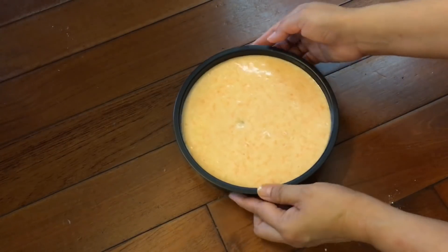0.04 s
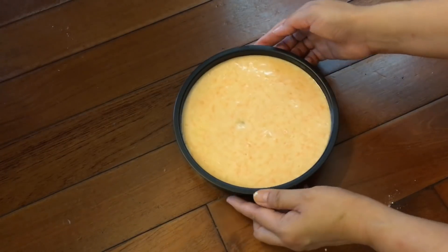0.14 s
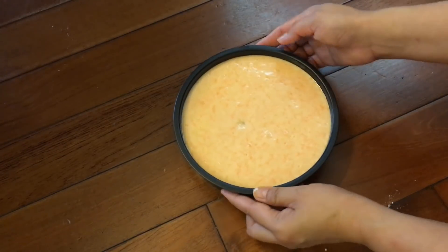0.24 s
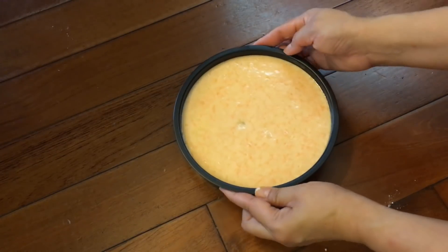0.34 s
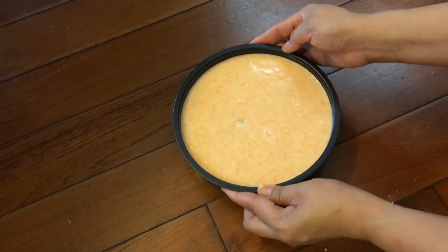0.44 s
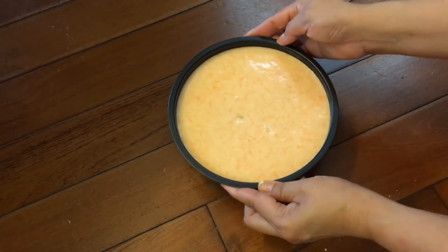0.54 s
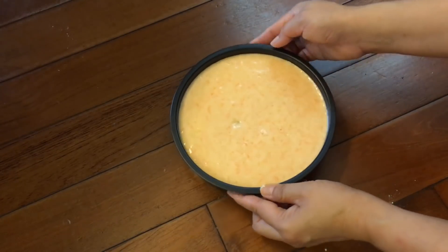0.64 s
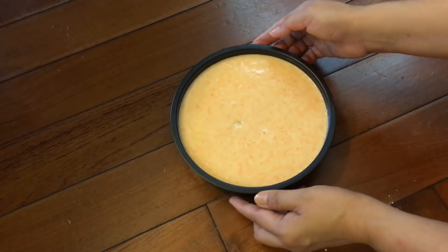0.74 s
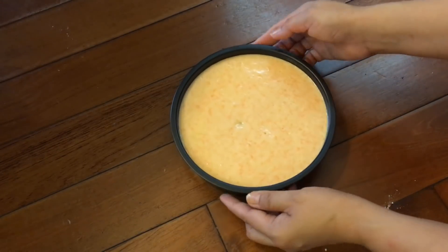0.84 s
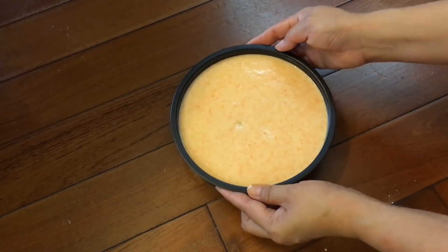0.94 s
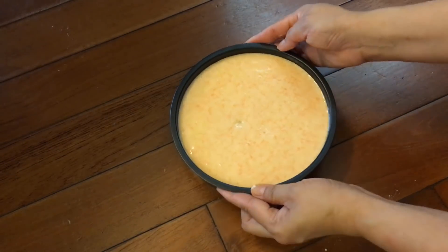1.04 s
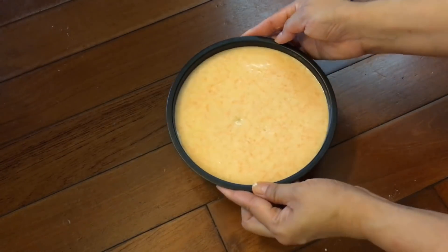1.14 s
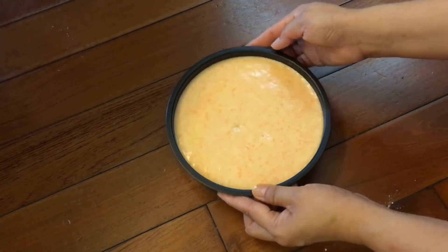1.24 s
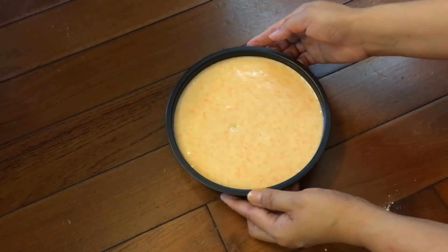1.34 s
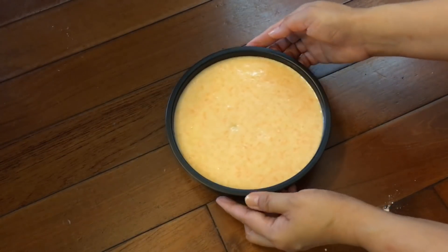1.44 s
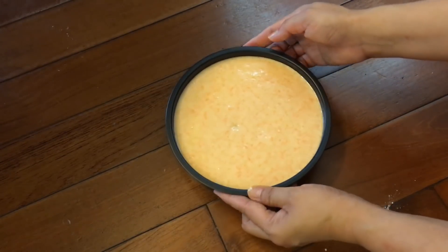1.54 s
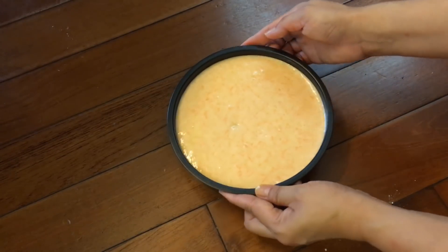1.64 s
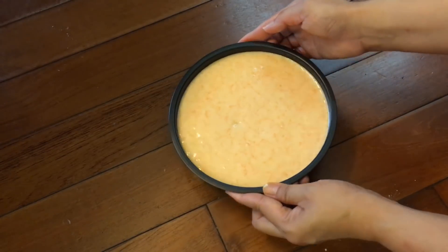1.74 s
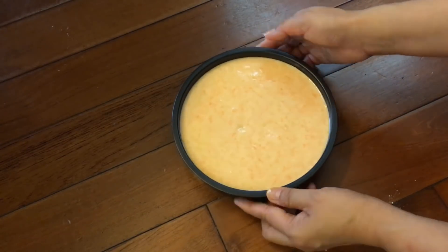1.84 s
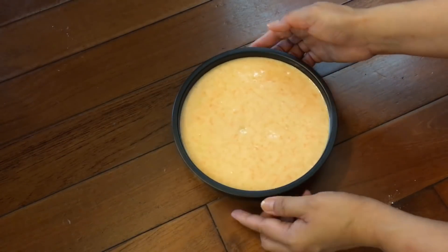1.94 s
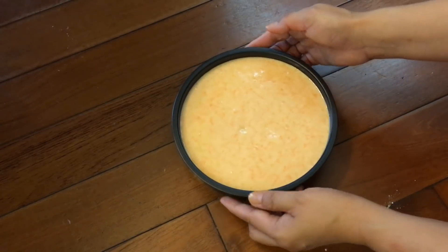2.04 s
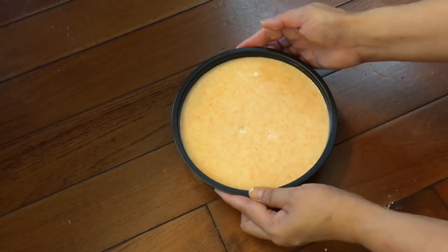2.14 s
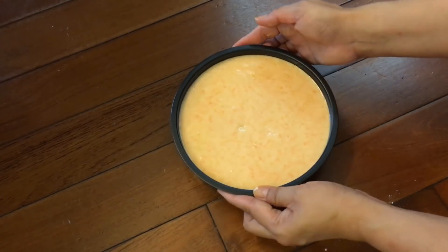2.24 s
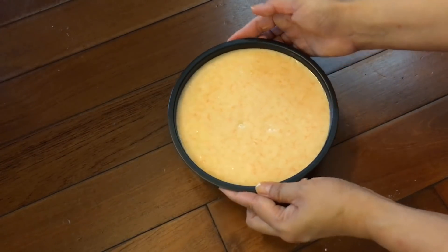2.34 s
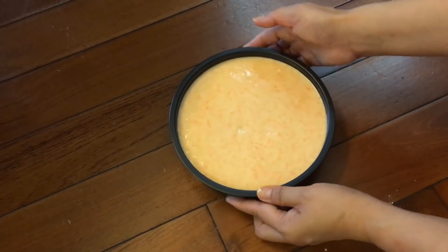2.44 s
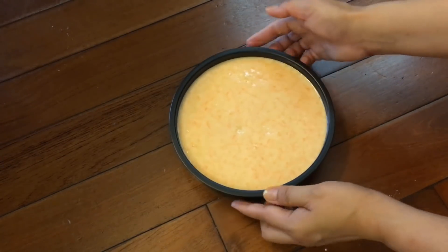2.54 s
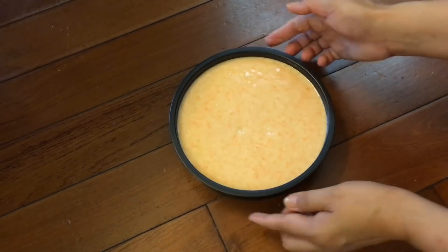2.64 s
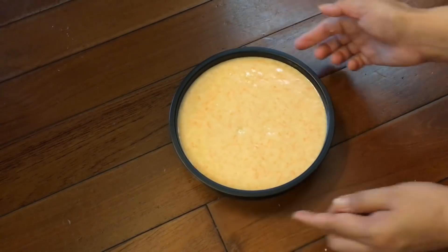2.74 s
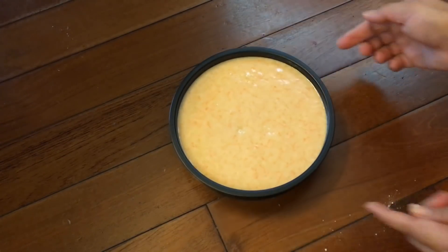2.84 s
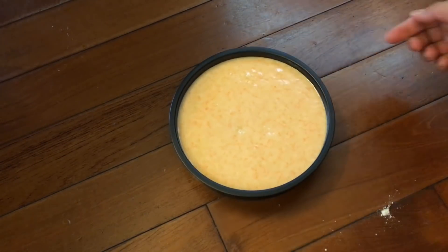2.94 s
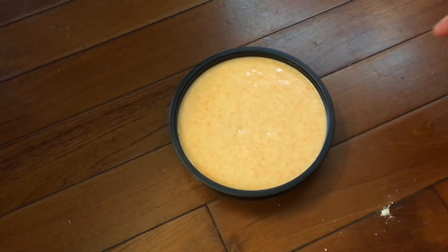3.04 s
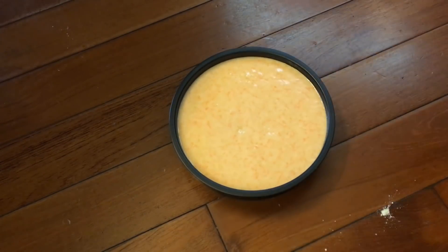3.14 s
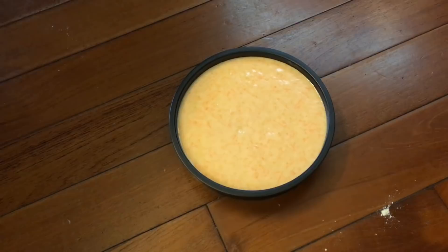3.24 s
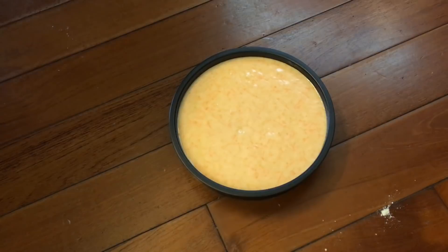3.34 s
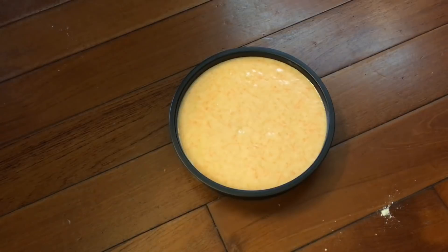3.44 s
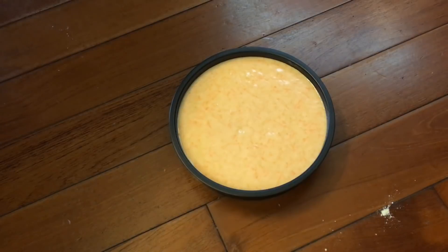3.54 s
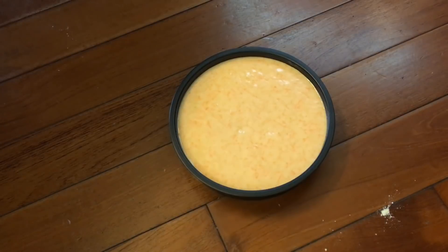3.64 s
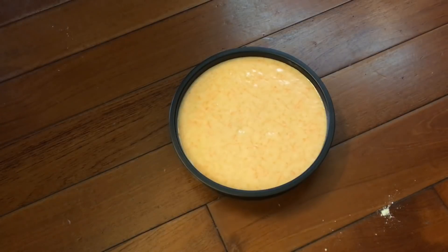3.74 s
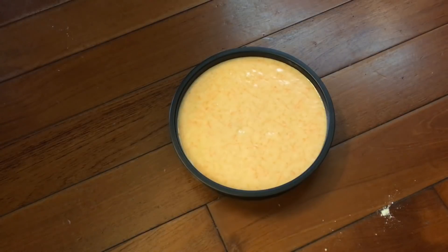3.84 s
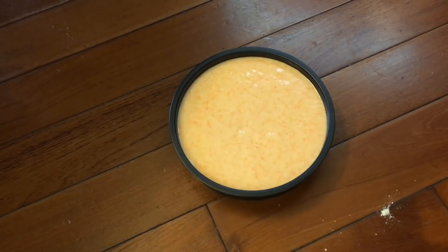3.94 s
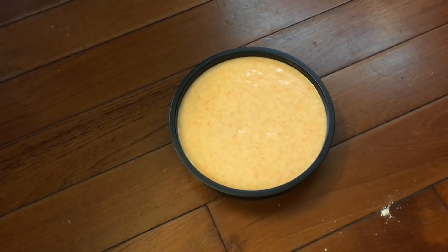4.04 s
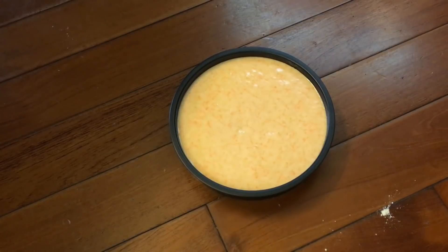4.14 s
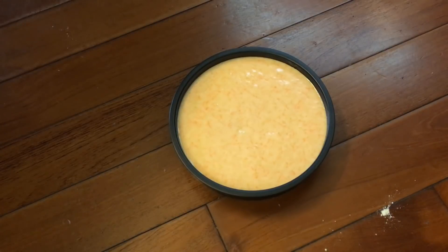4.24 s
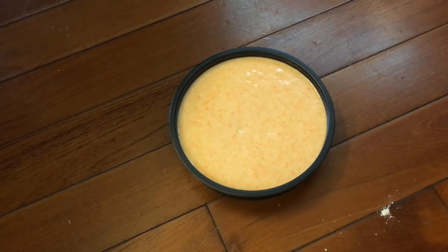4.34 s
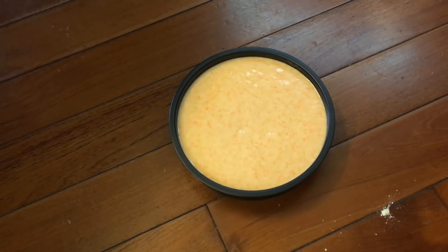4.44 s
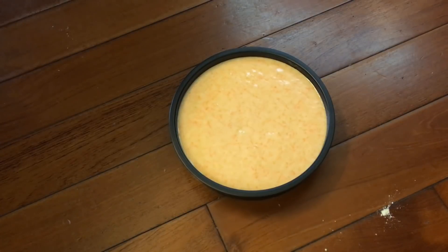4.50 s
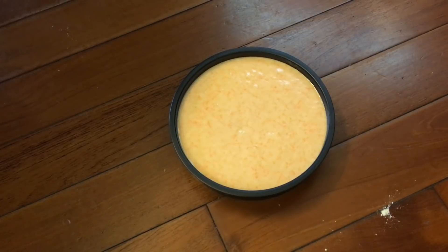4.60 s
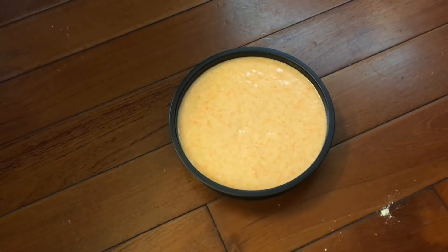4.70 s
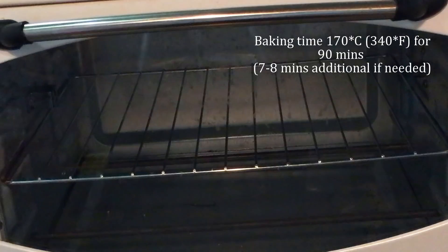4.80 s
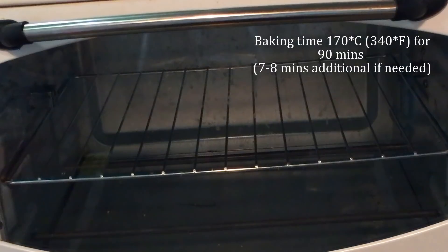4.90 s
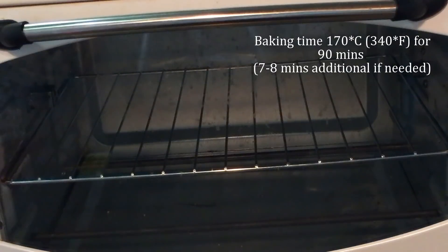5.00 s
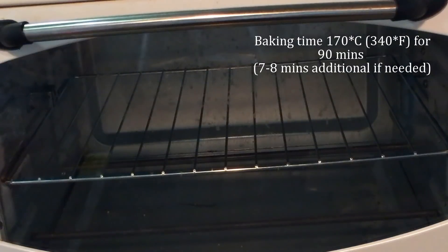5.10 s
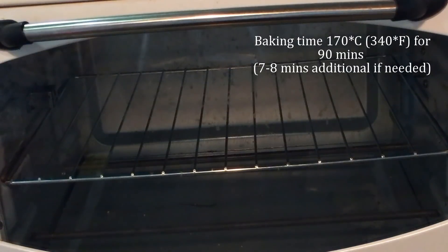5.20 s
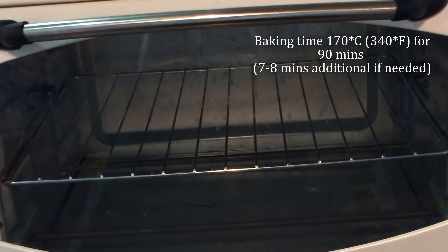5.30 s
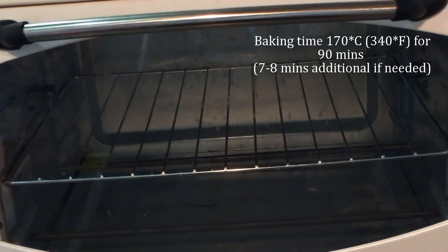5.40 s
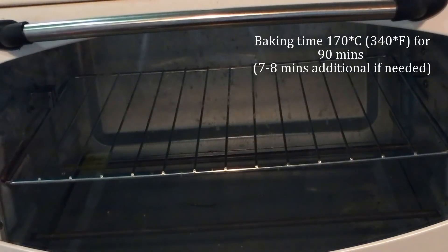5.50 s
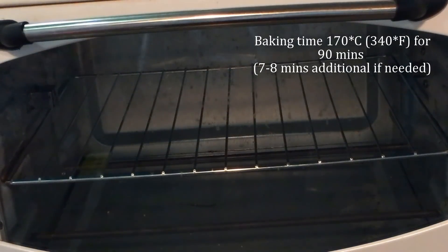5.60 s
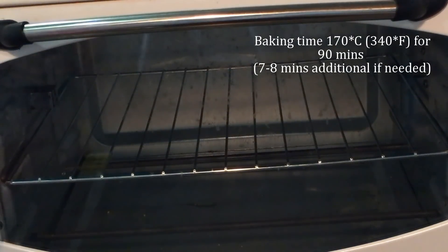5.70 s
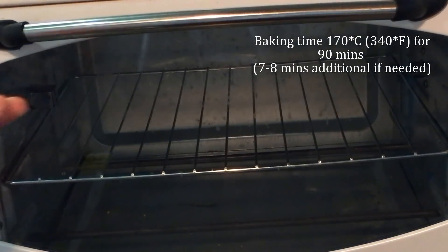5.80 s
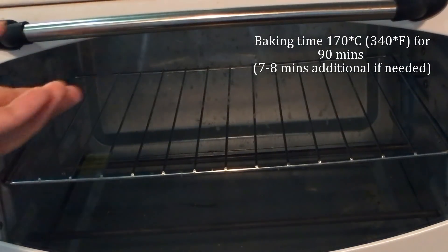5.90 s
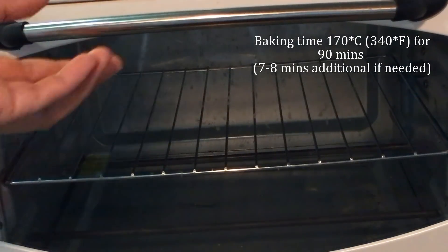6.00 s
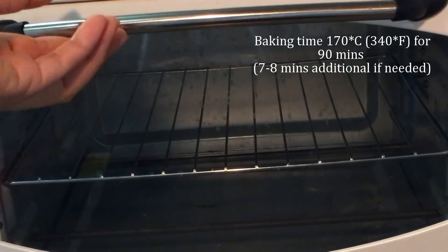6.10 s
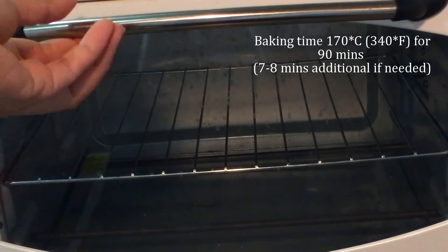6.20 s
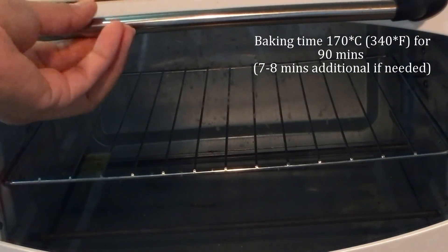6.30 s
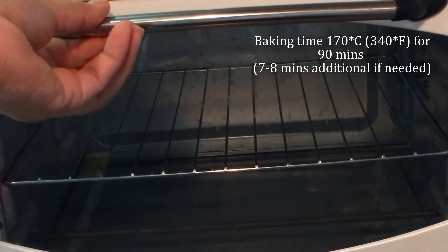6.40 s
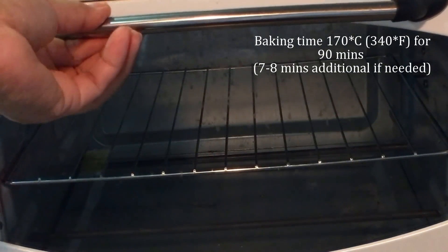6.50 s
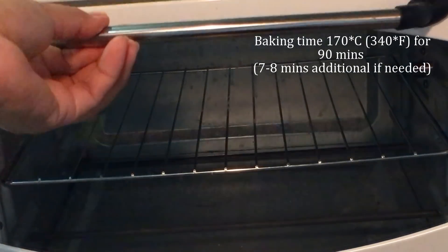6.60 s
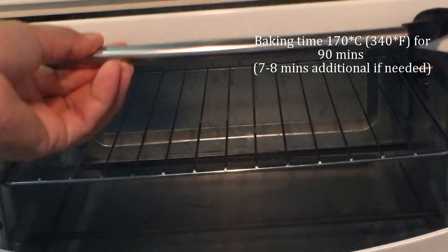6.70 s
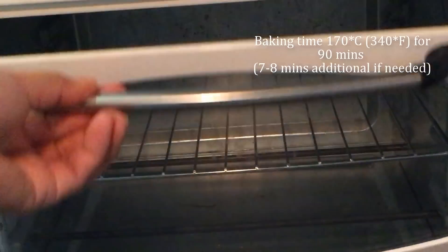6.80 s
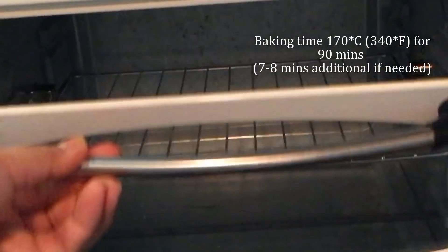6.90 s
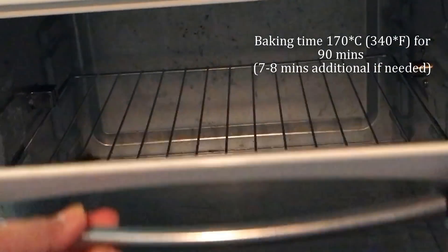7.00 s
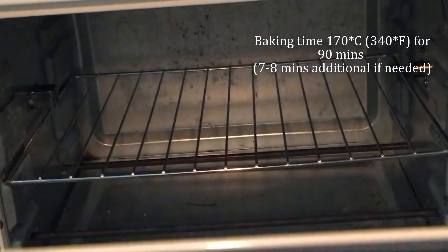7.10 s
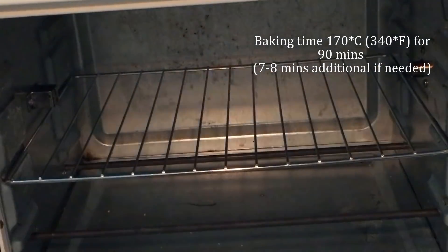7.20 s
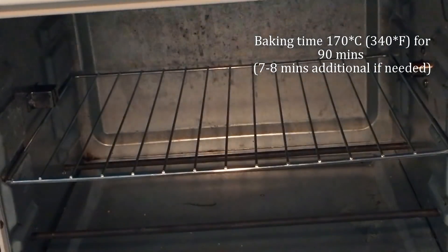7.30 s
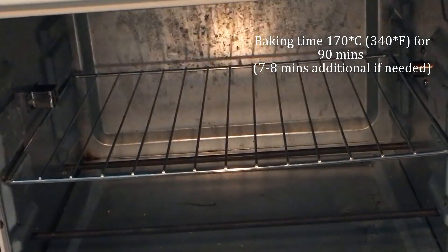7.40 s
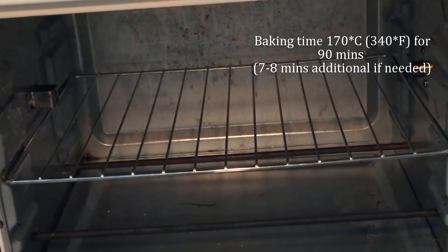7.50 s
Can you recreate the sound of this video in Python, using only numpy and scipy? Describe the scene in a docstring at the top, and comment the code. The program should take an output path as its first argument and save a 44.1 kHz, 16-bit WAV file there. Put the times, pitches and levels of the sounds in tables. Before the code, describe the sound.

A metal cake pan full of batter clacks onto a wooden floor five times, at about 0.1, 0.7, 1.4, 1.9 and 2.5 seconds. Each landing is loud and close, with a short sheet-metal rattle, a faint ring and a low thump of the boards; the second and fourth are softer and duller. Only faint kitchen hiss and low rumble follow, broken by a blink of silence around 4.8 seconds. At 5 seconds a small oven gives one sharp metallic ping, probably its timer bell. The clockwork timer then ticks lightly, about four times a second, over a faint hum and thin whine until the end. Around 6.6 seconds the door catch clicks and scrapes. The door clunks at 6.9 seconds, jolting the casing with a hollow boom, then the hinge scrapes softly, with two small clicks near 7.4 seconds.

```python
"""A metal cake pan full of batter clacks onto a wooden floor, five times: it lands on one edge, slaps
flat and settles, its bottom ringing, its sheet metal rattling, the boards thumping underneath.
After a blink of silence we are at a small oven: one sharp metallic ping, probably the timer's bell,
then the clockwork timer ticks over a faint hum and whine. The door is pulled open: the catch clicks,
the door clunks and jolts the casing, and the hinge scrapes in many tiny slips."""
import sys
import numpy as np
from scipy import signal
from scipy.fft import rfft, irfft, next_fast_len
from scipy.io import wavfile
from scipy.ndimage import uniform_filter1d

SR = 44100
rng = np.random.default_rng(int(sys.argv[2]) if len(sys.argv) > 2 else 0)


def persist_wave(psi):
    """Save psi, clipped to +-1, as 16-bit WAV."""
    counts = np.round(np.clip(psi, -1, 1) * 32767).astype(np.int16)
    wavfile.write(sys.argv[1], SR, np.atleast_2d(counts).T)


N = 332955
TIME = np.arange(N) / SR
RING_TIME = TIME[:SR * 2 // 3]

# The drops. Each row: start in seconds, force in dB, tilt time from edge to flat in seconds, contact
# hardness in Hz, clash of the edge in dB, give of the floor in dB, shimmer of the wall in dB.
DROPS = [(0.109, 0.5, 0.0082, 2755, -2, 1.5, 3), (0.7458, -2, 0.0038, 1400, -10.5, -3.5, -12.5),
         (1.3556, 0.5, .0115, 2637, -2, -1.5, 1), (1.9108, -4.5, .0092, 1477, -1.5, -1, -13),
         (2.53, 1.5, 0.0062, 4530, -0.5, -0.5, 6)]
# Ringing bodies. Each row: pitch in Hz, relative level in dB, ring time (t60) in seconds.
PAN_MODES = [(362, -9, 0.06), (482, -3, 0.023), (619, -16, 0.079), (735, -13, 0.045), (934, -8.5, 0.041),
             (1097, -7, 0.025), (1400, -7.5, 0.013)]   # the pan's bottom, damped by the batter
DRUM_MODE = [(267.6, 2, 0.078)]   # its lowest note, like a drumhead
RIM_MODES = [(1402, -24.5, 0.21), (1484, -28, .32), (1562, -24, 0.25), (1652, -33, 0.48), (1920, -34, 0.36),
             (2029, -27.5, 0.27), (2176, -35, .36), (2420, -35, 0.4), (2985, -35, .32), (3340, -42, 0.49)]   # the free rim, ringing on faintly
BOARD_MODES = [(94, -26.5, 0.7), (120, -16.5, 0.21), (150.54, -12.5, 0.24), (175, -9.5, 0.11),
               (225, -19, 0.18), (258.7, -26.5, 0.39), (320.7, -24, 0.31), (486, -22, 0.083),
               (612, -26, 0.25)]   # floorboards and room
PING_MODES = [(952, -9.5, 0.2), (1050, -18, 0.13), (1680, -13, 0.28), (1994, -14, 0.12), (3180, -17, 0.17),
              (3760, -1.5, 0.052), (4145, -9, 0.12), (5370, -2.5, 0.19), (8620, -7.5, 0.16),
              (9300, -9, 0.12), (9940, 0, 0.073)]   # probably the timer's bell
CASING_MODES = [(97.5, -15, 0.82), (136.5, -9.5, 0.15), (199, 0.5, 0.18), (230.5, 3.5, 0.079),
                (272, -7.5, 0.24), (332, -9, 0.22), (478, 3.5, 0.057)]
HINGE_MODES = [(1800, 0, .005), (2350, -3, .004), (3100, -8, .004)]
# Shimmer of the pan's wall. Each row: frequency in Hz, relative level of the modes there in dB.
SHIMMER_COLOUR = [(1200, -6.5), (2300, -0.5), (3400, -1), (4300, -9), (4900, -20.5)]
# Noise colours. Each row: frequency in Hz, relative spectral density in dB.
RATTLE_COLOUR = [(300, 13), (1100, 18), (1800, 26), (2700, 15.5), (3400, 12), (5500, 8), (9000, 0.5),
                 (15500, -7)]   # dense high modes of the pan's sheet metal
ECHO_COLOUR = [(100, 26.5), (600, 22.5), (950, 25), (1600, 17.5), (2600, 12.5), (3400, 11), (4500, 6),
               (9500, 2), (15500, -13)]   # the kitchen's answer to a landing
CRACK_COLOUR = [(500, 5), (1000, 31.5), (1900, 31), (2700, 21), (4000, 36), (6000, 22), (10000, 27.5),
                (11500, 14), (15000, 24)]   # attack of the ping
TICK_COLOUR = [(900, -19), (6000, -2.5), (8500, -6), (11000, -23)]
KNOCK_COLOUR = [(120, 10.5), (250, -8), (500, 0), (800, -1), (1400, 4.5), (2200, -6), (6000, -21),
                (9000, -60)]   # dull body of a door contact
CLICK_COLOUR = [(1500, 2), (4000, 2), (9000, -2), (15000, -5)]   # its bright edge
SCRAPE_COLOUR = [(150, 2), (300, 2), (520, -3.5), (780, -9.5), (1250, -1), (2300, -18), (4000, -22),
                 (5500, -63)]
RUB_COLOUR = [(200, 11.5), (500, 6.5), (1400, -10), (3000, -2), (5000, -16)]
RUMBLE_COLOUR = [(28, -22.5), (58, 4.5), (85, -4.5), (150, -13), (250, -24.5), (450, -34)]
KITCHEN_HISS_COLOUR = [(250, -12.5), (720, -18), (1900, -20.5), (4600, -32), (15000, -47.5)]
OVEN_HISS_COLOUR = [(250, 6.5), (450, -3), (620, -3), (1400, -0.5), (2300, -6), (7000, -15), (15000, -25.5)]
# Tails of the ping's crack and of the kitchen. Each row: frequency in Hz, decay time (t60) in seconds.
CRACK_T60 = [(1000, .16), (4000, .12), (12000, .07)]
ROOM_T60 = [(400, 0.31), (1000, 0.36), (2200, 0.41), (3600, 0.3), (5200, 0.2)]
# Catch and stops of the door. Each row: start in seconds, knock in dB, click in dB, click centre in Hz.
DOOR_CONTACTS = [(6.591, -25, -17.5, 5030), (6.6083, -10.5, -16, 5500), (6.654, 2.5, -18, 6000),
                 (6.67, -6.5, -38, 3000), (6.721, -14, -13, 5000), (6.826, -11.5, -17, 12000),
                 (6.9191, 16, -16, 5000), (6.96, -5, -34, 11000), (7.3481, -11, -11, 8500),
                 (7.398, -11, -27, 6500)]
# The door slides out of its catch, then swings on its hinge.
# Each row: start and end in seconds, scrape level in dB, attack and release in seconds.
DOOR_PULLS = [(6.559, 6.642, -48.5, 0.08, 0.13), (6.836, 7.447, -48, 0.054, 0.14)]
# Fingers on the pan, later on the door handle. Each row: peak and half-width in seconds, level in dB.
GRIPS = [(2.28, 0.036, -57), (6.491, 0.019, -52)]
# Cues. Each row: time in seconds, level in dB.
PING_STRIKES = [(5.025, -34.5)]
CASING_JOLTS = [(6.926, -28), (6.94, -21.5), (6.967, -33.5), (7.046, -34.5), (7.09, -42), (7.301, -44.5)]   # from the swinging door
RUMBLE_SWELLS = [(0.59, -46.5), (1.748, -47), (2.82, -38.5), (3.16, -58), (3.53, -52), (3.84, -52),
                 (4.04, -48)]
HUM_SWELLS = [(5.61, -47.5), (6.06, -44.5), (6.36, -47.5)]
# Hollow background notes. Each row: pitch in Hz, width in Hz, base level in dB.
KITCHEN_NOTES = [(260, 16, -78.5), (345, 20, -80), (1050, 200, -82.5), (1750, 120, -83.5), (2180, 150, -89)]
OVEN_NOTES = [(142.3, 16, -66), (190, 68, -71.5), (625, 61, -84), (1250, 105, -76)]   # air and casing resonate

BREAK_START_S, BREAK_END_S = 4.831, 4.877
WANDER_HZ = 2.5   # pace of the background's slow shifts
ECHO_FADE_IN = np.minimum(RING_TIME / 0.013, 1)   # reflections take a moment to build up
THIRD_OCTAVES = 100 * 2 ** (np.arange(23) / 3)
FILTER_BANK = [(low, high, signal.butter(2, [low, high], "band", fs=SR, output="sos"))
               for low, high in zip(THIRD_OCTAVES, THIRD_OCTAVES[1:])]


def cake_pan():
    """Each drop strikes with one edge, slaps flat, then the batter's weight settles on the boards."""
    out, wall_modes = np.zeros(N), pan_wall(count=140)
    for at, force_db, tilt_s, hardness_hz, clash_db, give_db, shimmer_db in DROPS:
        drum_db = 1.5 - 1501.5 * tilt_s   # the longer the pan tips over, the less its bottom drums
        edge = landing(hardness_hz, blow_db=-2, rattle_db=clash_db, thump_db=give_db - 12, drum_db=-21)
        flat = landing(hardness_hz, blow_db=2.5, rattle_db=-10.5, thump_db=give_db - 1.5, drum_db=drum_db)
        settle = landing(hardness_hz=1100, blow_db=-9, rattle_db=-11, thump_db=give_db - 4.5,
                         drum_db=-25.5)
        shimmer = from_db(shimmer_db) * ringing(wall_modes, uneven_db=1) * ECHO_FADE_IN
        add(out, at, from_db(force_db) * (edge + shimmer + flex(db=3, t60=0.014)))
        add(out, at + tilt_s, from_db(force_db) * (flat + flex(db=3.5 + give_db, t60=0.052)))
        add(out, at + tilt_s, floor_boom(db=-24.5 + 1.1 * force_db))
        add(out, at + 1.8 * tilt_s, from_db(0.92 * force_db) * settle)
    return out


def landing(hardness_hz, blow_db, rattle_db, thump_db, drum_db):
    """One contact rings the pan's bottom and rattles the sheet; the weight thumps the boards."""
    echo = dense_modes(ECHO_COLOUR, ROOM_T60) * ECHO_FADE_IN
    clack = ringing(PAN_MODES, uneven_db=5, detune=0.039)   # the sloshing batter shifts the modes
    bottom = from_db(blow_db) * cut(clack + echo, hardness_hz, "low", order=1)   # softer is duller
    bottom += from_db(drum_db) * ringing(DRUM_MODE)
    bottom = cut(bottom, 220, "high")   # a small pan radiates little bass
    rattle = dense_modes(RATTLE_COLOUR, t60=0.038) + ringing(RIM_MODES, uneven_db=0.5, detune=0.014)
    boards = cut(ringing(BOARD_MODES, uneven_db=4, detune=0.0096), 69, "high", order=3)
    return bottom + from_db(rattle_db) * rattle + from_db(thump_db) * boards


def pan_wall(count, db=-54.5, t60=0.5):
    """The thin wall's shimmer: a list of faint, long-lived modes, scattered in pitch."""
    pitches = rng.uniform(SHIMMER_COLOUR[0][0], SHIMMER_COLOUR[-1][0], count)
    return [(hz, db + at_hz(SHIMMER_COLOUR, hz), t60) for hz in pitches]


def flex(db, t60, start_hz=2330, halving_s=0.00042):
    """A contact sends a bending wave whose treble arrives first, so its pitch plunges."""
    return from_db(db) * decay(t60) * sine(start_hz / (1 + RING_TIME / halving_s))


def floor_boom(db):
    """Countless low modes of the whole floor boom dully and die away unevenly."""
    bass = cut(rng.standard_normal(len(RING_TIME)), 104, "low")
    bass = cut(bass, 58, "high", order=3)
    return from_db(db) * rms_one(bass) * decay(t60=0.56)


def ping():
    """One sharp, buzzing metallic ping just before the ticking, probably the timer's bell."""
    strike = clicks(*np.transpose(PING_STRIKES))
    buzz = 1 + 0.24 * drift(rate_hz=320)
    ring = through(strike, ringing(PING_MODES))
    crack = through(strike, dense_modes(CRACK_COLOUR, CRACK_T60))
    return buzz * ring + crack


def timer(first_s=5.2838, period_s=0.2642, tick_db=-28.5, tock_db=-24.5):
    """The clockwork escapement beats evenly, every second beat louder."""
    beats = np.arange(first_s, TIME[-1], period_s)
    levels_db = np.resize([tick_db, tock_db], len(beats))
    return through(clicks(beats, levels_db), dense_modes(TICK_COLOUR, t60=0.13))


def door():
    """Catch and stops knock and skid, each with its own brightness; jolts make the casing boom."""
    out = np.zeros(N)
    for at, knock_db, click_db, click_hz in DOOR_CONTACTS:
        metal = cut(dense_modes(CLICK_COLOUR, t60=0.17), click_hz, "low")
        metal = cut(metal, click_hz, "high", order=1)
        knock = from_db(knock_db) * dense_modes(KNOCK_COLOUR, t60=0.14)
        add(out, at, knock + from_db(click_db) * through(skid(), metal))
    jolts = cut(clicks(*np.transpose(CASING_JOLTS)), 570, "low")
    boom = through(jolts, ringing(CASING_MODES))
    return out + cut(boom, 71, "high")


def skid(slips_per_s=900, slip_db=-9, fade_s=0.012):
    """One contact followed by a quickly dying run of tiny slips."""
    slips = (rng.random(len(RING_TIME)) < slips_per_s / SR) * rng.standard_normal(len(RING_TIME))
    return (RING_TIME == 0) + from_db(slip_db) * slips * np.exp(-RING_TIME / fade_s)


def hinge(slips_per_s=1100, uneven_db=0.5, spots=2):
    """Tiny slips at the rubbing spots make the door scrape and hiss; mid-swing the hinge rasps."""
    pressure = from_db(uneven_db * drift(rate_hz=20))
    slipping = rng.random((spots, N)) < slips_per_s / spots / SR
    slips = slipping * rng.standard_normal((spots, N)) * pressure
    scrape = rms_one(sum(through(spot, dense_modes(SCRAPE_COLOUR, t60=0.055)) for spot in slips))
    hiss = rms_one(through(rng.standard_normal(N) * pressure, dense_modes(OVEN_HISS_COLOUR, t60=0.014)))
    ring = rms_one(through(slips.sum(axis=0), ringing(HINGE_MODES)))
    rasp = swell(at=7.22, half_width_s=0.08, db=-53.5) * ring
    return door_motion() * (scrape + from_db(-13.5) * hiss) + rasp


def door_motion():
    """Envelope of the rubbing: each pull builds up, holds and dies away."""
    out = 0
    for start, end, db, attack, release in DOOR_PULLS:
        rise = np.clip((TIME - start) / attack, 0, 1)
        fall = np.exp(-np.maximum(TIME - end, 0) / release)
        out += from_db(db) * rise * fall
    return out


def casing_rumble():
    """Once jolted free, the swinging door keeps the casing rumbling."""
    free = np.clip((TIME - CASING_JOLTS[0][0]) / 0.053, 0, 1)
    return from_db(7) * free * door_motion() * noise(RUMBLE_COLOUR)


def fingers():
    """Short soft rubs as the hand shifts its grip."""
    return sum(swell(*grip) for grip in GRIPS) * noise(RUB_COLOUR)


def background():
    """A bed of lumpy house rumble, with hiss and hollow notes that change at the cut to the oven."""
    at_oven = TIME > BREAK_START_S
    steady = from_db(np.where(at_oven, -58.5, -54.5))
    swells = sum(swell(at, 0.042, db) for at, db in RUMBLE_SWELLS)
    lumps = (1 + swells / steady) * from_db(2.5 * drift(rate_hz=3.6))
    rumble = steady * lumps * noise(RUMBLE_COLOUR)
    oven_hiss = from_db(-67) * hollow_hiss(OVEN_HISS_COLOUR)
    kitchen_hiss = from_db(-70.5) * hollow_hiss(KITCHEN_HISS_COLOUR)
    kitchen_hiss *= lumps ** 0.092   # rides gently on the rumble
    return rumble + np.where(at_oven, oven_hiss + oven_tones(), kitchen_hiss + drone(KITCHEN_NOTES))


def oven_tones():
    """A low hum wavers and swells, while a thin electronic whine and the cavity's resonance creep up."""
    hum_swells = sum(swell(at, 0.021, db) for at, db in HUM_SWELLS)
    hum_level = from_db(-61.5 + 3.4 * drift(rate_hz=5.9)) + hum_swells
    hum = hum_level * np.sin(2 * np.pi * 102 * TIME)
    whine_level = from_db(np.interp(TIME, [5.5, 7.2], [-83, -73]))
    whine = whine_level * sine(hz=14346 + 35 * drift(rate_hz=60))
    cavity = from_db(np.interp(TIME, [5.5, 6.1], [-1, 3])) * drone(OVEN_NOTES)
    return hum + whine + cavity


def hollow_hiss(colour, count=3):
    """Hollow hiss whose colour slowly shifts; rms 1."""
    shares = np.array([drift(WANDER_HZ) for _ in range(count)])
    shares /= np.linalg.norm(shares, axis=0)
    layers = [through(rng.standard_normal(N), dense_modes(colour, t60=0.025)) for _ in shares]
    return rms_one(np.sum(shares * layers, axis=0))


def drone(notes):
    """Narrow bands of noise that each waver slowly in level and pitch."""
    out = 0
    for hz, width_hz, db in notes:
        tone = sine(hz * (1 + 0.035 * drift(WANDER_HZ)))
        waver = from_db(2.5 * drift(WANDER_HZ))
        out += from_db(db) * rms_one(waver * drift(width_hz / 2) * tone)
    return out


def room(x, wet_colour, predelay_s):
    """Direct sound plus the kitchen's diffuse tail, coloured by points in Hz and dB."""
    tail = dense_modes(wet_colour, ROOM_T60)
    return x + through(x, np.concatenate([np.zeros(int(predelay_s * SR)), tail]))


def ringing(modes, uneven_db=0, detune=0):
    """A struck body: decaying sines whose level and pitch can vary from blow to blow."""
    out = 0
    for hz, db, t60 in modes:
        strength, shift = rng.standard_normal(2)
        fade = from_db(db + uneven_db * strength) * decay(t60)
        out += fade * np.sin(2 * np.pi * hz * (1 + detune * shift) * RING_TIME)
    return out


def dense_modes(colour, t60):
    """Countless struck modes as dying third-octave noises; t60 is one time or a table by Hz."""
    out = np.zeros(len(RING_TIME))
    white = rng.standard_normal((2, len(out)))   # neighbouring bands get unrelated noise
    for k, (low, high, sos) in enumerate(FILTER_BANK):
        hz = np.sqrt(low * high)
        life = t60 if np.isscalar(t60) else at_hz(t60, hz)
        audible = RING_TIME < 2 * life + 10 / low
        band = signal.sosfilt(sos, (white[k % 2] * decay(life))[audible])
        gain = from_db(at_hz(colour, hz)) * min(hz / colour[0][0], 1)
        out[audible] += gain * band * np.sqrt(2 * (high - low) / SR / np.sum(band ** 2))
    return out


def noise(colour):
    """Steady coloured noise, rolling off beyond its end points; rms 1."""
    size = next_fast_len(N)
    hz = np.fft.rfftfreq(size, 1 / SR) + 1
    ends = np.minimum(hz / colour[0][0], 1) * np.minimum(colour[-1][0] / hz, 1)
    gain = from_db(at_hz(colour, hz)) * ends ** 2
    return rms_one(irfft(rfft(rng.standard_normal(size)) * gain)[:N])


def drift(rate_hz):
    """Smooth random modulation; rms 1."""
    return rms_one(cut(rng.standard_normal(N), rate_hz, "low"))


def clicks(times, levels_db):
    """One impulse per contact."""
    out = np.zeros(N)
    out[np.round(np.asarray(times) * SR).astype(int)] = from_db(levels_db)
    return out


def swell(at, half_width_s, db):
    """A bell-shaped rise and fall."""
    return from_db(db) * np.exp(-((TIME - at) / half_width_s) ** 2)


def decay(t60):
    """A fade that loses 60 dB in t60 seconds."""
    return np.exp(-np.log(1000) * RING_TIME / t60)


def sine(hz):
    """A tone that follows a pitch curve."""
    return np.sin(2 * np.pi * np.cumsum(hz) / SR)


def through(x, response):
    """Play x through an impulse response."""
    return signal.fftconvolve(x, response)[:len(x)]


def cut(x, hz, kind, order=2):
    """Butterworth low- or high-pass."""
    return signal.sosfilt(signal.butter(order, hz, kind, fs=SR, output="sos"), x + 1e-18)


def add(out, at, sound):
    """Mix a sound in at a given time."""
    start = round(at * SR)
    out[start:start + len(sound)] += sound[:len(out) - start]


def at_hz(points, hz):
    """Read a table on a log-frequency axis."""
    frequencies, values = np.transpose(points)
    return np.interp(np.log(hz), np.log(frequencies), values)


def from_db(db):
    return 10 ** (np.asarray(db) / 20)


def rms_one(x):
    return x / np.sqrt(np.mean(x ** 2) + 1e-20)


def scene():
    """First the pan on the floor, then the oven, with a moment of silence between."""
    oven = ping() + timer() + door() + hinge()
    oven = room(oven, wet_colour=[(130, 6.5), (1500, -7), (12000, -17.5)], predelay_s=0.005)
    oven += casing_rumble()
    sounding = (TIME < BREAK_START_S) | (TIME > BREAK_END_S)
    gate = uniform_filter1d(sounding.astype(float), size=64)
    return ((cake_pan() + fingers() + oven + background()) * gate)[None]


def record(dry):
    """Trim the deepest bass, hard-clip the peaks of the landings and cut the very top."""
    clipped = np.clip(cut(dry, 36, "high", order=3), -0.95, 0.95)
    top_cut = signal.ellip(10, 0.1, 80, 15900, fs=SR, output="sos")
    return signal.sosfilt(top_cut, clipped)


dry = scene()
out = record(dry)
persist_wave(out)
```